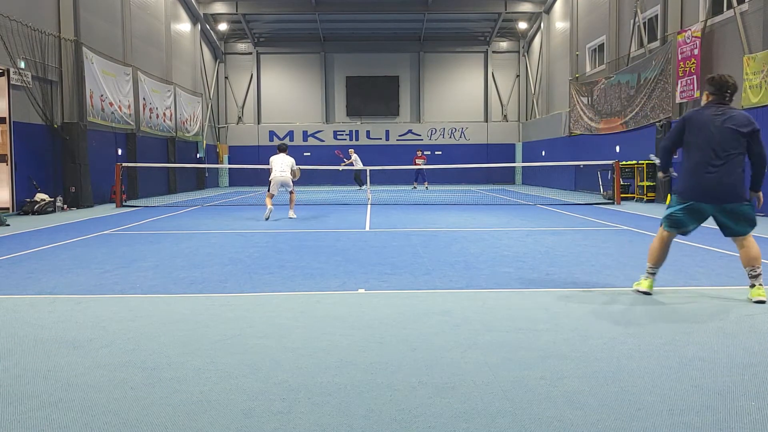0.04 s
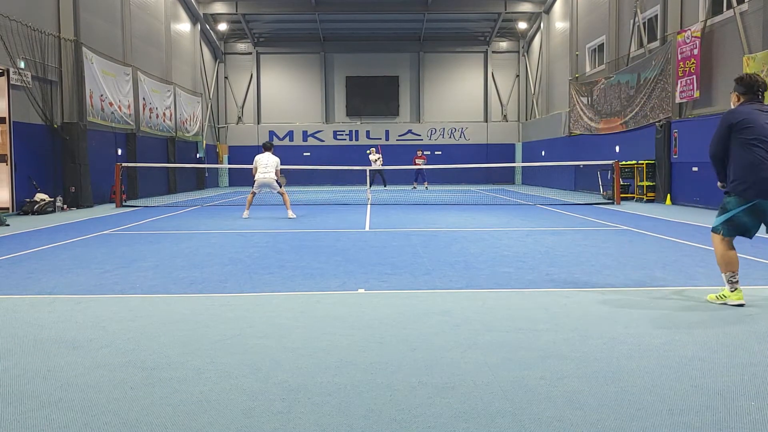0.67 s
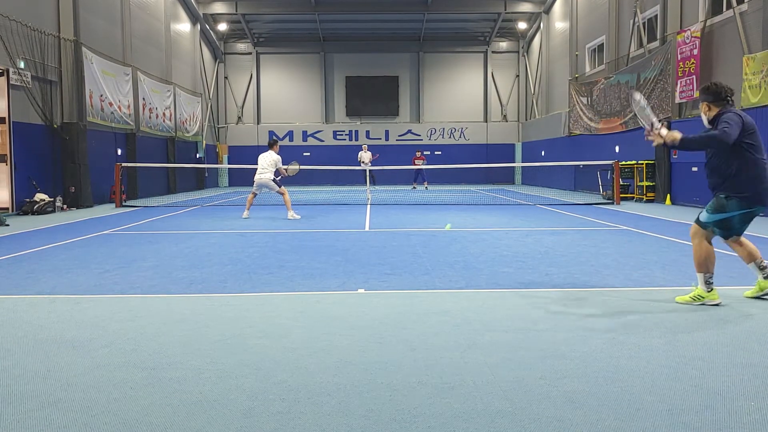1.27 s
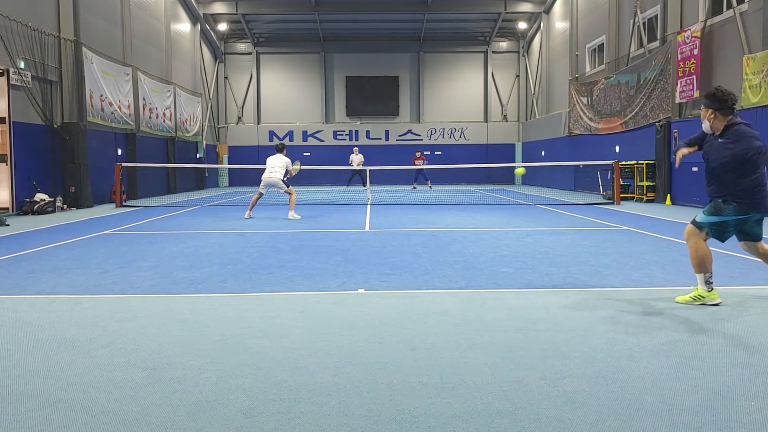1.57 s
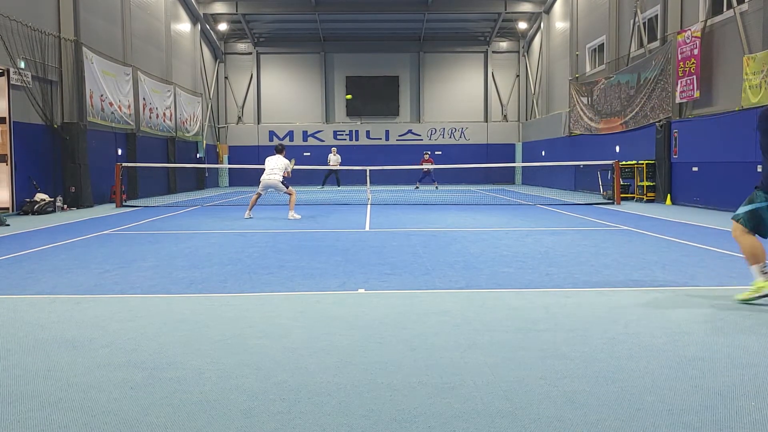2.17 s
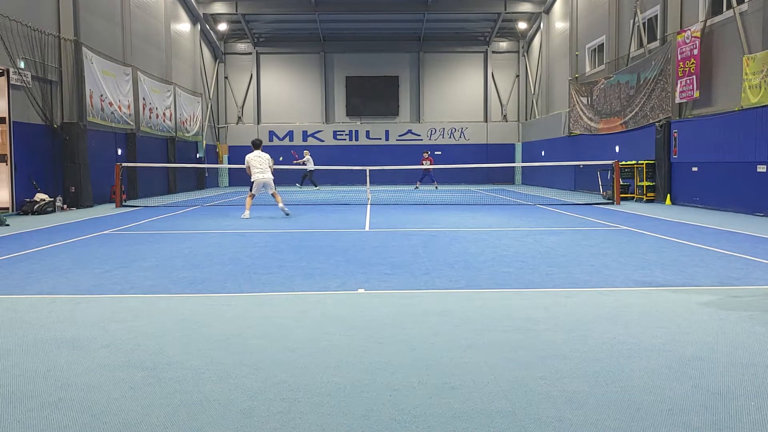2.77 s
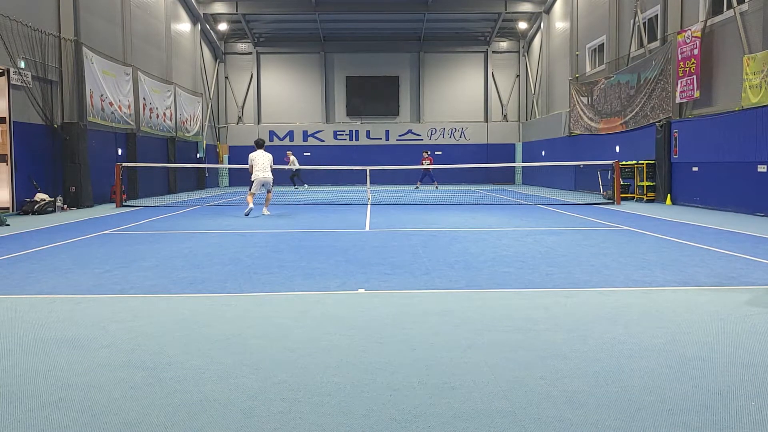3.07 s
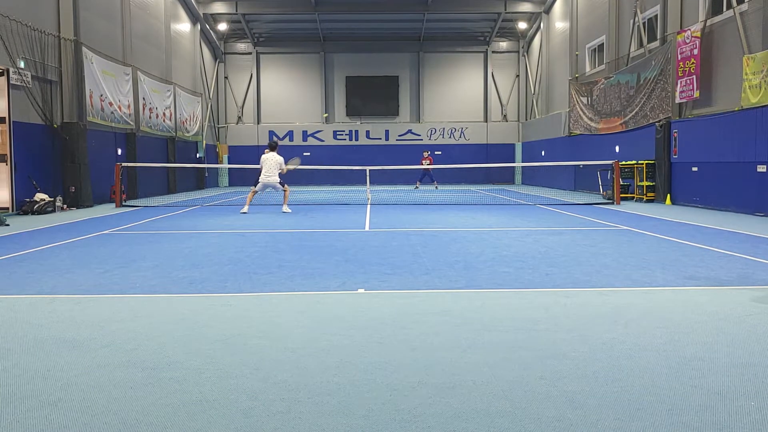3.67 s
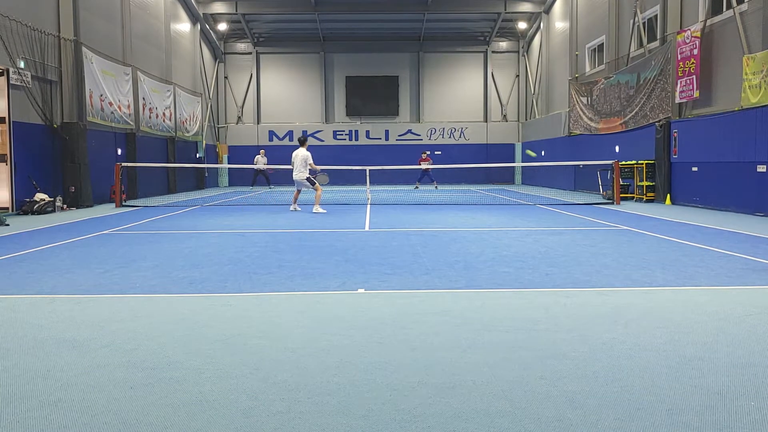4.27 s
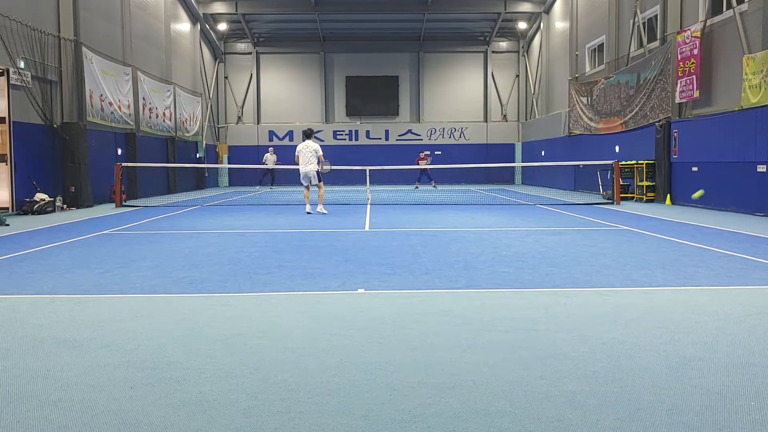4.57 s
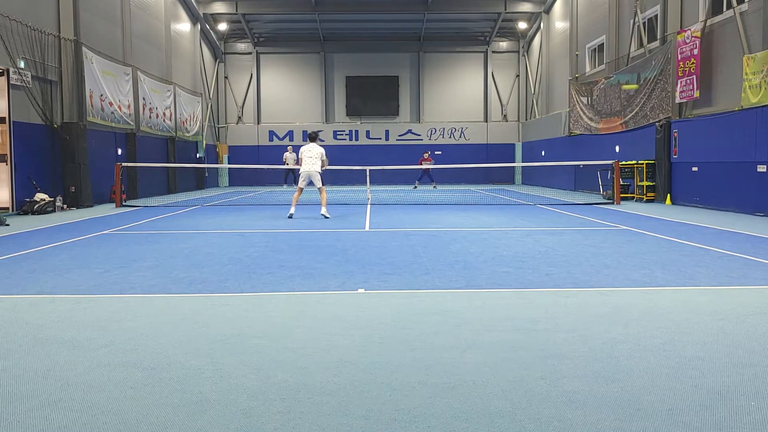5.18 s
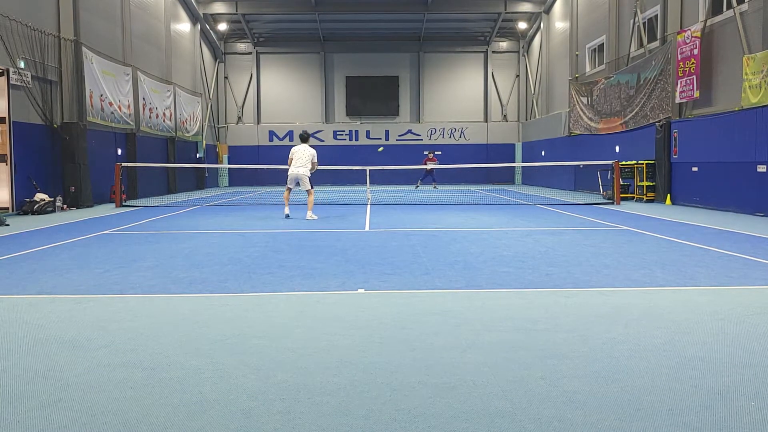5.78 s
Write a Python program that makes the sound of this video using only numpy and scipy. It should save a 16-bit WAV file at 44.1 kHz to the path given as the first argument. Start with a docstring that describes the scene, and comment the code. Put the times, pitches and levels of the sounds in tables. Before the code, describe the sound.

A tennis rally in a large, echoing indoor hall, heard from behind one baseline. Far and near rackets take turns for four hits, each a hollow pop with a ping of strings and a long ring; the last is softer. Lighter ball bounces fall between the strokes. Shoes pad and scuff faintly over a low steady building hum, and early on a very faint high chirp repeats.

```python
"""Doubles in a steel tennis hall

Stereo microphone behind one baseline. Far and near rackets take turns: the hollow ball thuds, the
strings ping, the felt cracks; between strokes the ball bounces. Walls and roof girders slap back,
and the hall rings for over two seconds. Shoes pad and scuff over the murmur of the building,
and early on a faint high chirp repeats."""
import sys
import numpy as np
from scipy import signal
from scipy.fft import rfft, irfft, next_fast_len
from scipy.io import wavfile
from scipy.ndimage import map_coordinates

SR = 44100
rng = np.random.default_rng(int(sys.argv[2]) if len(sys.argv) > 2 else 0)


def dump(signal):
    """Clip the signal to [-1, 1] and save it as 16-bit WAV at the path in sys.argv[1]."""
    limited = np.clip(np.atleast_2d(signal).T, -1, 1)
    pcm = np.round(limited * 32767).astype(np.int16)
    wavfile.write(sys.argv[1], SR, pcm)


N = 261954
T = np.arange(SR // 5) / SR  # time within one blow, s

# Levels in the tables are relative: each source trims them on the way to the microphone.
# spectrum of the building's murmur: freq_hz, level_db
ROOM_TONE = [(20, -18), (40, -6), (65, 0.5), (120, -5), (200, 4), (380, 0), (650, -44.5), (1050, 0),
             (2000, -40), (3200, -29), (5000, -41), (9500, -40), (12500, -37), (16000, -39)]
# ball on the court: start_s, thump_db, thump_hz, slap_db, edge_hz, direct_db, hall_build_s
BOUNCES = [(-0.03, -30, 338, -36.5, 3430, -38, 0.046), (1.3530, -42.5, 224, -39, 1540, 4.5, 0.0082),
           (3.1350, -36, 222, -34, 3500, -18, 0.037), (4.6022, -37, 226, -39, 3000, -2, 0.0088),
           (5.459, -55, 330, -50, 1510, 9.5, 0.045)]
# spectrum of the shell's slap: freq_hz, level_db
BOUNCE_SLAP = [(200, -16.5), (700, -18.5), (1250, 21.5), (1700, 19.5), (2250, 9), (3000, -0.5),
               (4500, -26.5), (9000, -54.5)]
# walls around a bounce: delay_s, level_db
COURT_ECHOES = [(0.024, 3), (0.029, 2.7), (0.044, 1)]
# the hardest footfalls: start_s, step_db, scuff_db
HARD_STEPS = [(0.05, -40, -45.5), (3.209, -44, -49.5), (3.719, -49.5, -39), (4.465, -55, -44.5)]
# spectrum of a rubbing sole: freq_hz, level_db
SCUFF = [(300, 7), (1600, 4), (2500, 9), (3300, -8.5), (4800, -13), (6800, -20), (10000, -27),
         (16000, -45.5)]
# strokes at the far baseline:
# start_s, thud_db, thud_hz, boom_db, strings_db, pitch_hz, upper_db, crack_db, direct_db
FAR_STROKES = [(0.5690, -22.5, 345.6, -29.5, -24.5, 993, -31.5, -23, -1.5),
               (3.4590, -18.5, 377, -27.5, -23, 852, -32.5, -23.5, -3)]
# main modes of the far string bed: pitch_ratio, level_db, t60_s
FAR_STRING_MODES = [(0.801, -6, 0.064), (1, 23.5, 0.0072), (1.218, -1.5, 0.017)]
# overtones of the far strings: freq_hz, level_db, t60_s
FAR_OVERTONES = [(1610, 6, 0.015), (2207, 9.5, 0.015), (2760, -11.5, 0.032), (3343, -1.5, 0.035),
                 (4320, -17.5, 0.086), (5230, -23, 0.018)]
# spectrum of the felt's crack: freq_hz, level_db
CRACK = [(40, -4.5), (150, 5), (600, 15), (1500, 2.5), (2400, 2.5), (3000, -4), (4500, -7), (7000, -12.5),
         (9000, -5), (12500, -21), (16000, -19)]
# strokes near the microphone: start_s, thud_db, thud_hz, boom_db, strings_db, pitch_hz,
# upper_db, knock_db, crack_db, direct_db, right_lead_ms
NEAR_STROKES = [(1.8570, -21.5, 323.7, -23, -22, 941, -28, -35, -17, -0.5, 0.15),
                (5.0665, -33, 345, -28, -31.5, 1080, -33, -33.5, -25.5, -5, 0.3)]
# overtones of the near strings: freq_hz, level_db, t60_s
NEAR_OVERTONES = [(1275, -5.5, 0.11), (1835, 1, 0.055), (2390, -10, 0.069), (3380, 0, 0.012),
                  (4804, 4.5, 0.004)]
# frame mode rung by a ball met off centre: freq_hz, level_db, t60_s
FRAME_KNOCK = [(618, 0, 0.022)]
# closest surface, back wall and corner at the near end: delay_s, level_db
NEAR_ECHOES = [(0.0042, -5), (0.026, -6), (0.0351, -1.5)]
# what a wall gives back: freq_hz, gain_db
WALL = [(1200, -3), (4000, -5), (8000, -4), (14000, -11)]
# spectrum of the early scatter: freq_hz, level_db
EARLY_COLOUR = [(60, 3.5), (200, 11.5), (600, -1), (1200, -11), (4000, 4.5), (12000, -10)]
# spectrum of the hall's tail: freq_hz, level_db
HALL_COLOUR = [(50, -20.5), (120, -6), (200, 3), (350, 1.5), (500, -2), (660, -8.5), (950, 0), (2500, 0.5),
               (5000, 4), (8000, 3), (13000, -2.5)]
# decay of the hall's tail: freq_hz, t60_s
HALL_T60 = [(60, 0.8), (150, 3.47), (400, 2.64), (1000, 3.45), (2000, 2.535), (3500, 1.514), (6500, 0.99),
            (9000, 0.51), (14000, 0.18)]
# likeness of left and right in the diffuse sound: freq_hz, correlation
COHERENCE = [(100, 0.98), (250, 0.91), (500, 0.77), (1000, 0.049), (2000, -0.05), (6000, -0.036)]
# response common to both microphone ports: freq_hz, gain_db
MICROPHONE = [(25, -5), (55, -0.5), (5800, -1), (6750, 7.5), (7700, -3), (10000, -8.5), (11200, -16),
              (12200, 3), (15500, -0.5)]
# imbalance of the ports: freq_hz, left_minus_right_db
PORT_BALANCE = [(200, 0.5), (550, -1), (1000, -2.5), (2000, 4), (4000, 1), (8000, 3), (13000, -2)]


def amp(db):
    """Decibels to gain."""
    return 10 ** (np.asarray(db) / 20)


def along(points, hz):
    """A curve through (freq_hz, value) points, read at hz on a log axis."""
    freqs, values = np.transpose(points)
    return np.interp(np.log(hz + 1), np.log(freqs + 1), values)


def blow(x):
    """Scale to the energy of 10 ms at rms 1."""
    return x * np.sqrt(SR / 100 / np.sum(x ** 2))


def filtered(x, response):
    """Pass x through a gain given as a function of frequency."""
    n = x.shape[-1]
    padded = next_fast_len(n + SR // 10)
    return irfft(rfft(x, padded) * response(np.fft.rfftfreq(padded, 1 / SR)), padded)[..., :n]


def add(track, start_s, x):
    """Mix x into the track from start_s on."""
    i = round(start_s * SR)
    x = x[..., max(-i, 0):N - i]
    track[..., max(i, 0):max(i, 0) + x.shape[-1]] += x


def click(spectrum):
    """A causal click with this spectrum."""
    n = len(T)
    cepstrum = irfft(np.log(amp(along(spectrum, np.fft.rfftfreq(n, 1 / SR)))), n)
    return blow(irfft(np.exp(rfft(2 * cepstrum[:n // 2], n)), n))


def ring(modes, attack_s):
    """Damped modes that swell during contact; a small body radiates only their change."""
    swell = 1 - np.exp(-T / attack_s)
    motion = swell * sum(amp(db - 60 * T / t60) * np.sin(2 * np.pi * hz * T) / hz
                         for hz, db, t60 in modes)
    return blow(np.diff(motion, prepend=0))


def diffuse(n, colour):
    """Noise reaching the microphone from all sides: alike in the bass, unrelated in the treble."""
    def mid_side_gains(hz):
        angle = np.arccos(np.clip(along(COHERENCE, hz), -1, 1)) / 2
        return amp(along(colour, hz)) * [np.cos(angle), np.sin(angle)]
    mid, side = filtered(rng.standard_normal((2, n)), mid_side_gains)
    return np.array([mid + side, mid - side])


def hall(x, build_s, early_db, early_t60_s):
    """Scatter from nearby walls, then the long tail in which the treble dies first."""
    n = 3 * SR
    t = np.arange(n) / SR
    hz, frame_s, bands = signal.stft(diffuse(n, HALL_COLOUR), SR, nperseg=512)
    decay = amp(-60 * frame_s / along(HALL_T60, hz)[:, None])
    tail = signal.istft(bands * decay, SR, nperseg=512)[1][:, :n]
    early = diffuse(n, EARLY_COLOUR) * amp(early_db - 60 * t / early_t60_s)
    build = 1 - np.exp(-(t / build_s) ** 2)
    return signal.fftconvolve(x[None], amp(-33.5) * build * (tail + early), axes=1)


def arrive(start_s, x, echoes, lead_ms, mirror=0.69, scatter=0.9, scatter_t60_s=0.092):
    """A blow at the microphone, then duller echoes, part mirrored, part scattered by girders and banners."""
    out = np.zeros((2, N))
    right_first = lambda hz: np.exp(-1j * np.pi * hz * lead_ms / 1000 * np.array([[1], [-1]]))
    add(out, start_s, filtered(x, right_first))
    dull = filtered(x, lambda hz: amp(along(WALL, hz)))
    for delay_s, db in echoes:
        wall = diffuse(len(T), EARLY_COLOUR) * amp(-60 * T / scatter_t60_s)
        smear = signal.fftconvolve(dull[None], wall, axes=1)[:, :len(T)]
        echo = mirror * dull + scatter * smear * np.std(dull) / np.std(smear)
        add(out, start_s + delay_s, amp(db) * echo)
    return out


def room_tone():
    """All around, the steady murmur of the building under a thin hiss."""
    murmur = diffuse(N, ROOM_TONE)
    return amp(-51) * murmur / np.std(murmur)


def bounces():
    """The ball meets the court: a low thump and a slap of its shell, which the felt cushions."""
    out = np.zeros((2, N))
    contact = 1 - np.exp(-T / 0.0003)
    for start_s, thump_db, thump_hz, slap_db, edge_hz, direct_db, build_s in BOUNCES:
        cushion = lambda hz: 1 / (1 + (hz / edge_hz) ** 4)
        thump = amp(thump_db) * ring([(thump_hz, 0, 0.013)], attack_s=0.00035)
        shell = amp(slap_db) * ring([(1213, -2.5, 0.014), (1740, -2, 0.0089)], attack_s=0.0006)
        direct = contact * filtered(thump + shell, cushion)
        out += arrive(start_s, amp(direct_db) * direct, COURT_ECHOES, lead_ms=0.077)
        pop = filtered(thump + amp(slap_db) * click(BOUNCE_SLAP), cushion)
        add(out, start_s, hall(pop, build_s, early_db=8.5, early_t60_s=0.24))
    return out


def footwork(count, stride_s=0.6, scatter_s=0.12, step_db=-52, scuff_db=-66, spread_db=2):
    """Light steps at a loose, even pace: start_s, step_db, scuff_db."""
    steps = []
    for k, (late, weight, drag) in enumerate(rng.standard_normal((count, 3))):
        start_s = (k + 0.5) * stride_s + scatter_s * late
        if start_s < N / SR:
            steps.append((start_s, step_db + spread_db * weight, scuff_db + spread_db * drag))
    return steps


def shoes():
    """Out on the court, each footfall is a soft pad and a short scuff of the sole."""
    feet = np.zeros(N)
    for start_s, step_db, scuff_db in HARD_STEPS + footwork(count=10):
        pad = ring([(218, 0, 0.038)], attack_s=0.0015)
        rub = filtered(rng.standard_normal(len(T)), lambda hz: amp(along(SCUFF, hz)))
        scuff = blow(rub * T * amp(-60 * T / 0.15))
        add(feet, start_s, amp(step_db) * pad + amp(scuff_db) * scuff)
    reverb = hall(feet, build_s=0.0057, early_db=-17.5, early_t60_s=0.1)[:, :N]
    return amp(-3.5) * feet + amp(-7) * reverb


def chirps(first_s=0.313, every_s=0.202, start_hz=5200, end_hz=4500, length_s=0.087, count=8):
    """Faint in the hall, a run of thin, fluttering whistles, each sliding down as it fades."""
    calls = np.zeros(N)
    pitch_hz = start_hz + (end_hz - start_hz) * T / length_s
    release = np.clip((length_s - T) / 0.01 + 1, 0, 1)
    envelope = (1 - np.exp(-T / 0.008)) * amp(-60 * T / 0.82) * release
    for k in range(count):
        flutter = map_coordinates(rng.standard_normal(len(T)), [T * 150])  # 150 random turns a second
        level_db = -76 + 2 * rng.standard_normal() + 3 * flutter
        phase = 2 * np.pi * np.cumsum(pitch_hz * (1 + 0.0038 * flutter)) / SR
        add(calls, first_s + k * every_s, amp(level_db) * envelope * np.sin(phase))
    return calls + amp(-3.5) * hall(calls, build_s=0.015, early_db=8, early_t60_s=0.3)[:, :N]


def ball(thud_db, thud_hz, boom_db, t60_s, cut_hz=92):
    """The squashed ball's hollow thud and the frame's boom; both are too small to radiate deep bass."""
    thud = ring([(thud_hz, 0, t60_s)], attack_s=0.003)
    boom = ring([(164, 6.5, 0.012), (105, -11.5, 0.039)], attack_s=0.0011)
    low_cut = lambda hz: hz ** 2 / (hz ** 2 - cut_hz ** 2 - 1j * hz * cut_hz)
    return filtered(amp(thud_db) * thud + amp(boom_db) * boom, low_cut)


def felt(force_db):
    """Felt tearing over the strings during contact; a harder blow is brighter."""
    rub = rng.standard_normal(len(T)) * amp(-60 * T / 0.032) * (1 - np.exp(-T / 0.003))
    crack = signal.fftconvolve(rub, click(CRACK))[:len(T)]
    edge_hz = 12500 * amp(0.61 * (force_db + 29))
    return amp(force_db) * blow(filtered(crack, lambda hz: 1 / (1 + (hz / edge_hz) ** 4)))


def girders(count, first_s=0.029, step_s=0.0195, first_db=3.5, loss_db=2.5):
    """Echoes from one roof girder after another, ever weaker: delay_s, level_db."""
    return [(first_s + k * step_s, first_db - k * loss_db) for k in range(count)]


def far_strokes():
    """From the far baseline the thud arrives first and the hall brings most of the ping."""
    out = np.zeros((2, N))
    for (start_s, thud_db, thud_hz, boom_db, strings_db, pitch_hz,
         upper_db, crack_db, direct_db) in FAR_STROKES:
        modes = [(ratio * pitch_hz, db, t60) for ratio, db, t60 in FAR_STRING_MODES]
        strings = amp(strings_db) * ring(modes, attack_s=0.002)
        upper = amp(upper_db) * ring(FAR_OVERTONES, attack_s=0.00054)
        thud = ball(thud_db - 1.5, thud_hz, boom_db - 11, t60_s=0.019)
        direct = thud + amp(-21) * strings + amp(-10.5) * felt(crack_db)
        out += arrive(start_s, amp(direct_db) * direct, girders(count=4), lead_ms=0)
        pop = ball(thud_db, thud_hz, boom_db, t60_s=0.0079)
        crack = amp(crack_db) * click(CRACK)
        add(out, start_s, hall(pop, build_s=0.011, early_db=-10, early_t60_s=0.61))
        add(out, start_s, hall(strings + upper, build_s=0.0093, early_db=-17.5, early_t60_s=1.0))
        add(out, start_s, hall(crack, build_s=0.018, early_db=-13, early_t60_s=0.25))
    return out


def near_strokes():
    """Near the microphone and off to the right, a racket booms and its strings ring on brightly."""
    out = np.zeros((2, N))
    contact = 1 - np.exp(-T / 0.00096)
    for (start_s, thud_db, thud_hz, boom_db, strings_db, pitch_hz,
         upper_db, knock_db, crack_db, direct_db, lead_ms) in NEAR_STROKES:
        thud = ball(thud_db - 2.5, thud_hz, boom_db + 0.5, t60_s=0.026)
        ping = amp(strings_db + 5) * ring([(pitch_hz, 0, 0.024)], attack_s=0.016)
        upper = amp(upper_db) * ring(NEAR_OVERTONES, attack_s=0.003)
        knock = amp(knock_db) * ring(FRAME_KNOCK, attack_s=0.0011)
        direct = contact * (thud + ping + upper + amp(8) * knock) + felt(crack_db)
        out += arrive(start_s, amp(direct_db) * direct, NEAR_ECHOES, lead_ms,
                      mirror=0.52, scatter=0.69, scatter_t60_s=0.052)
        # a shorter thud and ping set the hall ringing
        short_thud = ball(thud_db - 0.5, thud_hz, boom_db - 4.5, t60_s=0.013)
        short_ping = amp(strings_db) * ring([(pitch_hz, 0, 0.014)], attack_s=0.018)
        pop = short_thud + short_ping + upper + knock
        crack = amp(crack_db - 3.5) * click(CRACK)
        add(out, start_s, hall(pop, build_s=0.012, early_db=7.5, early_t60_s=0.18))
        add(out, start_s, hall(crack, build_s=0.015, early_db=3, early_t60_s=0.078))
    return out


def scene():
    """The rally over the hall's background, from behind the baseline."""
    return far_strokes() + near_strokes() + bounces() + shoes() + chirps() + room_tone()


def record(dry):
    """Two small microphone ports, each with its own colour, and nothing above 15.8 kHz."""
    ports = lambda hz: amp(along(MICROPHONE, hz) + along(PORT_BALANCE, hz) * np.array([[0.5], [-0.5]]))
    return filtered(dry, lambda hz: ports(hz) * (hz < 15800))


dry = scene()
out = record(dry)
dump(out)
```